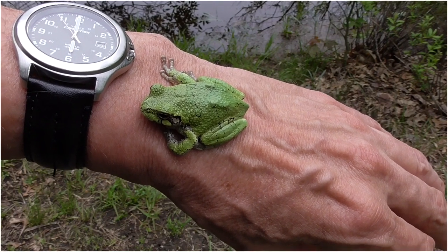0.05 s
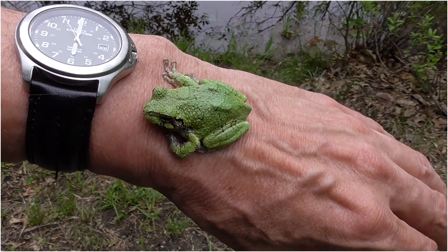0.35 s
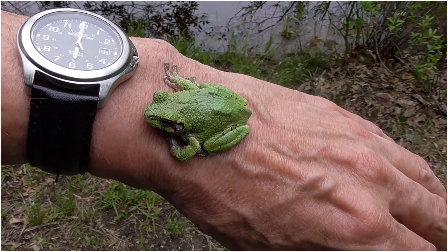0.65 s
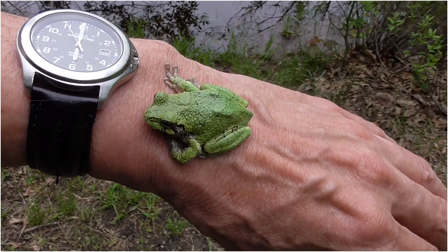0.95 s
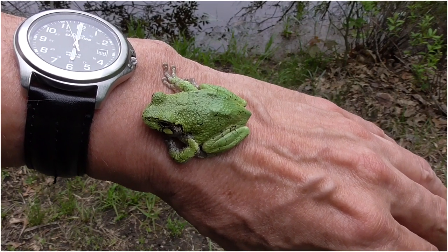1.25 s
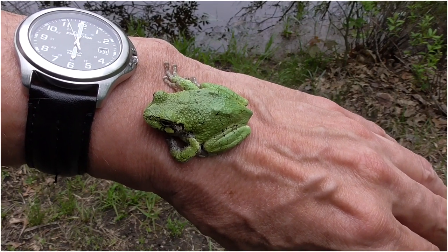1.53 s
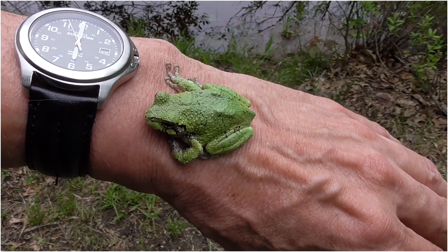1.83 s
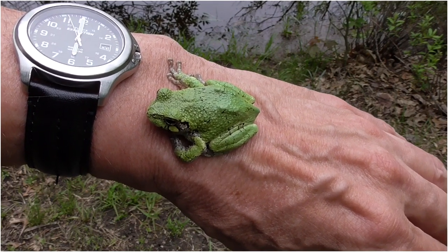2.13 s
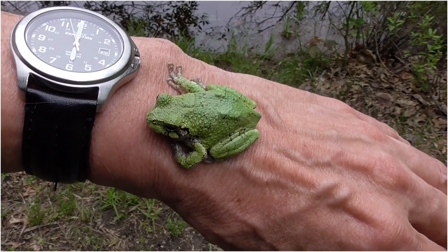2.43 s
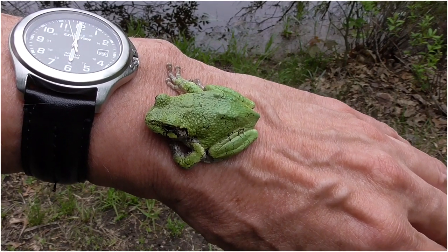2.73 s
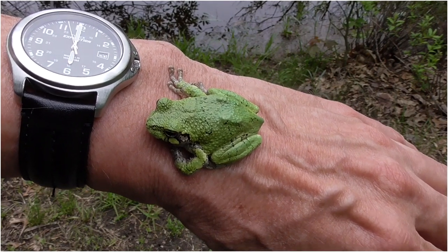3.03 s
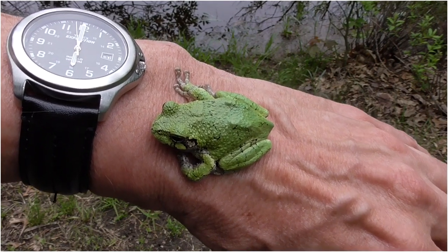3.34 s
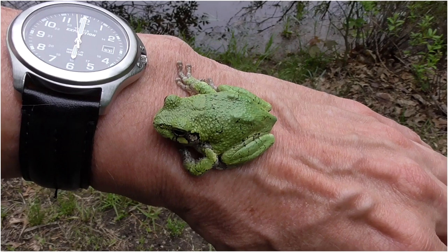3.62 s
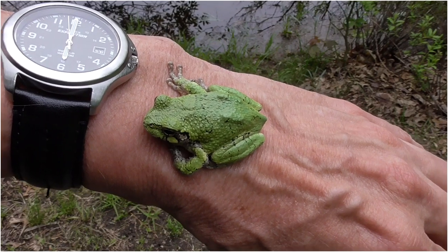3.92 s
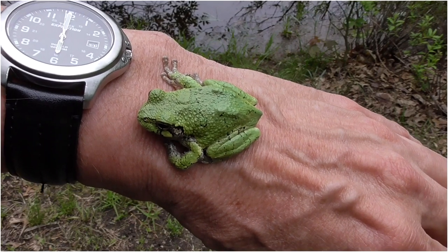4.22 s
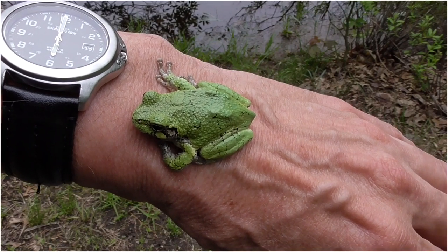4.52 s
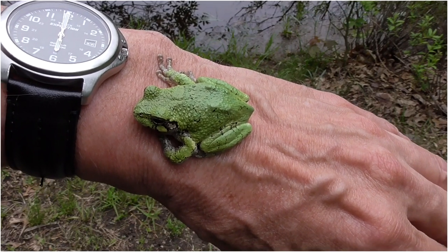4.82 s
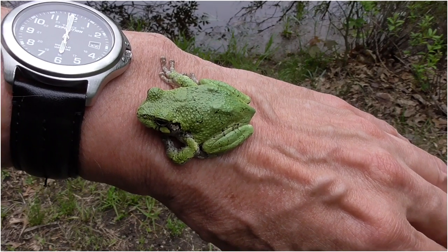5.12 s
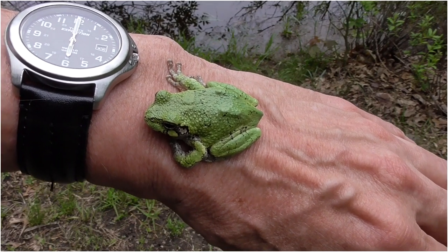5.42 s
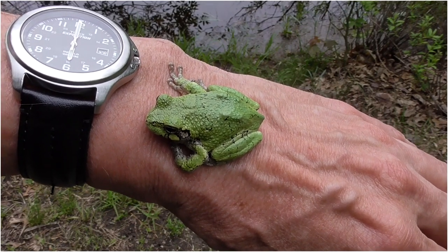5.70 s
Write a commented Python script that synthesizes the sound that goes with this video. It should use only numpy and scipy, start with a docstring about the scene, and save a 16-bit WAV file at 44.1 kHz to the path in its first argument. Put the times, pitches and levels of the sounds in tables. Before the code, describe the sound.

A quiet outdoor scene beside a pond: far wind rumbles in gentle swells throughout, under a thin, steady microphone hiss. Distant birds give faint, high, raspy calls at the very start. From about 0.2 seconds a nearer songbird whistles short phrases of quick notes that slide up and down, each leaving a brief echo among the trees. Its phrases come at roughly 0.2 to 0.6, 1.2 to 2.5, 3.1 to 4.0 and, more softly, 4.4 to 4.9 seconds, with a last brief one around 5.3. The far birds call again near 3.4 and 5.1 seconds. Four soft, dull knocks on the hand-held camera fall between 0.8 and 1.5 seconds, and tiny dry ticks are barely heard at about 1.0, 3.4 and 4.4 seconds. Two lower knocks follow in quick succession near 5.6 seconds, along with very faint distant chirps.

```python
"""From the start, far wind rumbles and the microphones hiss at the edge of a pond; distant birds call faintly.
A moment later a near songbird begins whistling short phrases of notes that slide up and down.
Trunks and leaves smear each whistle into a tail, more so when the bird faces away.
Around one second in come a few soft knocks on the hand-held camera, and the first of three tiny ticks.
The far birds call now and then; the near one stops shortly before two last knocks."""
import sys
import numpy as np
from scipy import signal
from scipy.fft import rfft, irfft
from scipy.io import wavfile

SR = 44100
rng = np.random.default_rng(int(sys.argv[2]) if len(sys.argv) > 2 else 0)


def put_to_file(sound):
    """Save the sound as 16-bit audio at rate SR, in the file named by the first command-line argument."""
    columns = np.atleast_2d(sound).T  # one column per channel
    safe = np.clip(columns, -1, 1)
    whole_steps = np.round(safe * 32767)
    wavfile.write(sys.argv[1], SR, whole_steps.astype(np.int16))


N = 262836
TIME = np.arange(N) / SR


def gain_of(db):
    """Turns decibels into a number to multiply a sound by."""
    return 10 ** (np.asarray(db) / 20)


def evened(x):
    """Scales a signal to an average strength (rms) of 1."""
    return x / np.sqrt(np.mean(x ** 2) + 1e-20)


def read(points, hz):
    """Reads between the rows of a (f/Hz, value) table, with octaves evenly spaced."""
    f, value = np.transpose(points)
    return np.interp(np.log(hz + 1), np.log(f + 1), value)


def add(mix, start_s, sound):
    """Mixes a sound in at its start time."""
    part = mix[max(round(start_s * SR), 0):][:len(sound)]
    part += sound[:len(part)]


def wander(length, hz):
    """A smooth random wobble of about size 1 that changes up to about hz times a second."""
    size = max(length, SR)
    f = np.fft.rfftfreq(size, 1 / SR)
    spectrum = rfft(rng.standard_normal(size)) * np.exp(-(f / hz) ** 2)
    return evened(irfft(spectrum, size))[:length]


def stereo_noise(colour):
    """Spectra of noise at two close microphones: alike in the bass, unrelated in the treble."""
    # how alike left and right are: f/Hz, likeness (0 to 1)
    likeness = [(30, 0.93), (125, 0.97), (250, 0.83), (500, 0.7), (1000, 0.42), (2000, 0.17), (5000, 0.14),
                (15000, 0)]
    # how the noise leans to one side: f/Hz, left minus right/dB
    balance = [(60, 1.5), (110, 0.5), (200, 0.5), (380, -0.5), (700, -1.5), (1290, -2.5), (2380, 0),
               (4400, 0.5), (8120, 0.0), (15000, -1.5)]
    hz = np.fft.rfftfreq(N, 1 / SR)
    common, separate = rfft(rng.standard_normal((2, N)))
    same, lean_db = read(likeness, hz), read(balance, hz)
    left = common * gain_of(lean_db / 2)
    right = (same * common + np.sqrt(1 - same ** 2) * separate) * gain_of(-lean_db / 2)
    return hz, np.array([left, right]) * gain_of(read(colour, hz))


def wind(calm_rumble_db=-53, calm_roar_db=-53.5, split_hz=400, top_hz=2600, waver_db=0.08):
    """Far wind: a low rumble and a soft, higher roar whose levels move with each gust."""
    # the wind's tone colour: f/Hz, relative level/dB
    colour = [(20, -35), (47, -8), (85, -3.5), (120, -1.5), (148, 0.5), (185, 0.5), (250, -2), (400, -3),
              (600, -3.5), (850, -3), (1100, -9), (1400, -19), (1800, -28.5), (2600, -34.5)]
    # gusts: t of the peak/s, half length/s, change in rumble/dB, change in roar/dB
    gusts = [(0.423, 0.13, 4, 1), (.76, 0.19, 2.8, 1.3), (1.153, .2, 2, 0.8), (1.545, .12, -0.5, 2.1),
             (2.15, 0.35, 1.3, -0.5), (2.76, .1, 2, .6), (3.53, 0.34, 3.5, 0.9), (3.963, 0.055, 2.3, 2.5),
             (4.46, 0.26, -0.5, 1.5), (5.55, .25, 1, 0.6)]
    hz, spectra = stereo_noise(colour)
    rumble_db, roar_db = calm_rumble_db + waver_db * wander(N, 1.3), calm_roar_db
    for peak_s, half_s, rumble_change, roar_change in gusts:
        swell = np.exp(-((TIME - peak_s) / half_s) ** 2)
        rumble_db += rumble_change * swell
        roar_db += roar_change * swell
    low_band = 1 / (1 + (hz / split_hz) ** 10)
    high_band = (1 - low_band) * (hz < top_hz)
    rumble = evened(irfft(spectra * low_band, N))
    roar = evened(irfft(spectra * high_band, N))
    return rumble * gain_of(rumble_db) + roar * gain_of(roar_db)


def hiss(level_db=-66.5, waver_db=0.6):
    """The microphones' own hiss; its level wavers slightly."""
    # the hiss's tone colour: f/Hz, relative level/dB
    colour = [(1000, -13), (1900, -3.5), (3000, -1.5), (6500, -4), (9000, -1.5), (12000, -2.5), (12800, -2),
              (13100, -10), (13400, -2.5), (15700, -7.5)]
    level = gain_of(level_db + waver_db * wander(N, 21))
    _, spectra = stereo_noise(colour)
    return level * evened(irfft(spectra, N))


def whistle(hz, level_db, rasp, rasp_hz=450, flutter_db=2.0, fade_s=0.0056, overtone_db=-30):
    """One side of a bird's voice box makes a nearly pure tone; a fast tremble in pitch makes it rasp."""
    count = len(hz)
    trembling_hz = hz * (1 + rasp * wander(count, rasp_hz))
    phase = 2 * np.pi * np.cumsum(trembling_hz) / SR
    level = gain_of(level_db + flutter_db * wander(count, 160))
    fade = signal.windows.tukey(count, min(2 * fade_s * SR / count, 1))
    return np.sqrt(2) * level * fade * (np.sin(phase) + gain_of(overtone_db) * np.sin(2 * phase))


def slur(top_s, rise_s, fall_s, start_hz, top_hz, end_hz, db, rasp, swell_db=4.5, brisk_hz_per_s=31500):
    """A note whose pitch climbs to a rounded top, drops quickly and levels out; gives (start, sound)."""
    rise_bend, fall_knee = 0.58, 0.42  # smaller values make the pitch move earlier
    tilt_db, ends_db = -2, -4.5  # the note weakens as it goes, and is softer at both ends
    t = np.arange(-rise_s, fall_s, 1 / SR)
    up, down = np.clip(1 + t / rise_s, 0, 1), np.clip(t / fall_s, 0, 1)
    climbed = np.sin(np.pi / 2 * up ** rise_bend) ** 2
    dropped = (1 + fall_knee ** 2) * down ** 2 / (down ** 2 + fall_knee ** 2)
    hz = start_hz + (top_hz - start_hz) * climbed + (end_hz - top_hz) * dropped
    speed = abs(np.gradient(hz)) * SR
    briskness = speed / (speed + brisk_hz_per_s) - .5  # louder while the pitch moves fast
    place = up + down - 1  # -1 at the start, 0 at the top, 1 at the end
    level_db = db + swell_db * briskness + tilt_db * place + ends_db * place ** 2
    return top_s - rise_s, whistle(hz, level_db, rasp)


def glide(start_s, length_s, start_hz, end_hz, db, rasp, arch_db=4):
    """A plain note that slides evenly and swells in the middle; gives (start, sound)."""
    progress = np.arange(0, length_s, 1 / SR) / length_s
    hz = start_hz + (end_hz - start_hz) * progress
    level_db = db + arch_db * (np.sin(np.pi * progress) - .5)
    return start_s, whistle(hz, level_db, rasp)


def echoes(x, shape, shared=0.46, echoes_per_s=4000):
    """Many random echoes that die away along a shape, partly the same at both microphones."""
    taps = rng.standard_normal((3, SR)) * (rng.random((3, SR)) < echoes_per_s / SR)
    tail = shape * (np.sqrt(shared) * taps[0] + np.sqrt(1 - shared) * taps[1:])
    tail /= np.linalg.norm(tail, axis=1, keepdims=True)
    return signal.fftconvolve(x[None], tail, axes=1)[:, :N]


def leaves(x, blur_db=0.5, blur_t60=0.1):
    """The straight path through the leaves, blurred by twigs; a t60 is the seconds to fade by 60 dB."""
    blur = echoes(x, gain_of(-60 * TIME[:SR] / blur_t60))
    return (x + gain_of(blur_db) * blur) / np.hypot(1, gain_of(blur_db))


def trees(x, near_t60=0.64, far_t60=1.8, far_db=-11.0, build_s=0.0048, clump_db=3):
    """A quick tail from near branches and a long one from the wood behind; trunks return it in clumps."""
    t = TIME[:SR]
    decay = np.hypot(gain_of(-60 * t / near_t60), gain_of(far_db - 60 * t / far_t60))
    build_up = 1 - np.exp(-t / build_s)
    clumps = gain_of(clump_db * wander(SR, 90))
    return echoes(x, decay * build_up * clumps)


def far_birds(calls_boost_db=1, straight_db=-7, pan_right_db=0.7):
    """Distant birds, heard mostly as echoes from the trees."""
    # one bird's high raspy slurs: t of the top/s, rise/s, fall/s, start f/Hz, top f/Hz, end f/Hz, level/dB
    calls = [(0, 0.0056, 0.089, 6550, 6420, 5590, -60), (0.095, 0.016, .056, 5600, 5630, 4580, -55.5),
             (3.405, .011, 0.029, 4200, 4950, 3840, -58.5), (3.452, 0.027, 0.013, 4200, 5010, 4830, -56.5),
             (3.484, 0.019, 0.04, 4900, 5690, 4400, -58), (5.061, 0.041, .02, 4500, 5690, 4660, -59),
             (5.075, .004, 0.0244, 4260, 4310, 3770, -52), (5.126, .036, 0.0203, 3860, 5580, 5010, -57.5),
             (5.147, 0.006, 0.0244, 5200, 5350, 4660, -52)]
    # faint chirps from deep in the wood: t/s, length/s, start f/Hz, end f/Hz, level/dB
    chirps = [(0, 0.021, 4140, 4090, -64), (.815, 0.026, 4800, 3440, -71), (5.611, 0.047, 3700, 3210, -73),
              (5.675, .028, 5300, 5600, -76), (5.69, .05, 2900, 2600, -75)]
    raspy, chirping = np.zeros((2, N))
    for row in calls:
        add(raspy, *slur(*row, rasp=0.0244))
    for row in chirps:
        add(chirping, *glide(*row, rasp=0.0093))
    song = gain_of(calls_boost_db) * raspy + chirping
    heard = gain_of(straight_db) * leaves(song) + trees(song)
    return heard * gain_of([[-pan_right_db], [pan_right_db]])


def near_bird(closing_scatter_db=-7, pan_right_db=1.5):
    """The near singer: turning its head shifts each note between the straight path and the trees."""
    # its arching notes: t of the top/s, rise/s, fall/s, start f/Hz, top f/Hz, end f/Hz, level/dB,
    # scattered over straight sound/dB
    slurs = [ (.253, .022, 0.026, 3165, 3590, 2395, -55, 12),
             (.320, 0.03, 0.043, 2555, 4110, 2560, -55.5, 8),
             (.440, 0.02, 0.029, 3020, 3550, 2510, -53.5, 7),
             (.466, 0.019, 0.027, 3130, 4370, 3520, -54.5, 13),
             (.497, .006, 0.055, 3850, 4150, 2560, -54, 2), (.575, 0.026, 0.039, 2660, 3710, 2450, -58, -4),
             (1.257, .027, 0.035, 3290, 4130, 3350, -59.5, -5),
             (1.328, .038, .02, 3400, 4720, 4720, -57, -1), (1.354, .006, 0.061, 4670, 4700, 2576, -56, -1),
             (1.468, .008, 0.02, 4870, 4950, 4750, -54, 7),
             (1.484, 0.0057, 0.063, 4520, 4670, 2834, -51.5, 4),
             (1.581, 0.024, .02, 2880, 3280, 3100, -52.5, 1),
             (1.597, 0.0042, 0.021, 2650, 2650, 2330, -59.5, -4),
             (1.704, 0.0083, 0.015, 2780, 2990, 2280, -62, 3),
             (1.74, 0.014, 0.016, 2400, 2900, 2360, -65, -2),
             (1.940, 0.02, 0.033, 3180, 3646, 2340, -59, -4),
             (2.034, 0.045, 0.0064, 2390, 4550, 4550, -57.5, -3),
             (2.048, 0.0043, 0.027, 4350, 4390, 3770, -59.5, -3),
             (2.289, 0.014, 0.025, 3110, 3680, 2950, -55, 5), (2.345, .033, .03, 3125, 4250, 4200, -54, 6),
             (2.394, 0.016, 0.037, 4030, 4150, 2955, -53.5, 2),
             (2.372, .004, 0.023, 4870, 5100, 3915, -51, 6),
             (2.441, .018, 0.017, 2960, 3070, 2820, -53.5, -1),
             (3.098, 0.047, .062, 3150, 4570, 2590, -60, -1.5),
             (3.327, .024, 0.036, 3220, 3730, 2460, -57.5, -4),
             (3.384, 0.021, 0.042, 2490, 2900, 2205, -62, -3),
             (3.644, 0.017, 0.019, 3276, 3540, 2770, -57.5, 0),
             (3.692, .028, 0.022, 2900, 3800, 3700, -53.5, 4),
             (3.728, .008, 0.031, 3620, 3700, 2510, -53.5, 5.5),
             (3.72, 0.0087, .036, 4530, 4720, 3370, -57, 5),
             (3.908, 0.0036, 0.0124, 4600, 4790, 4080, -55, 7),
             (3.917, .004, 0.048, 3950, 3950, 2640, -51.5, 5),
             (3.990, 0.023, 0.024, 2680, 3755, 2980, -54, 2),
             (4.459, .012, 0.0076, 3340, 3540, 2620, -65, -13),
             (4.514, 0.032, 0.029, 2810, 3650, 3200, -59.5, -6),
             (4.539, .004, 0.035, 3750, 3830, 2520, -59.5, -11),
             (4.587, 0.015, 0.028, 2560, 2810, 2290, -65, -6),
             (4.765, 0.025, 0.033, 3010, 3440, 2520, -62, -4),
             (4.824, 0.022, .028, 2500, 3300, 2400, -63, -1),
             (5.274, 0.022, .027, 2540, 3560, 2570, -51.5, 1.5),
             (5.320, 0.02, 0.038, 2740, 3600, 2890, -53.5, -4),
             (5.322, .012, 0.031, 4370, 4880, 3570, -52, 5)]
    # low, nearly flat whistles that close its phrases: t/s, length/s, start f/Hz, end f/Hz, level/dB
    closing_notes = [(1.75, 0.039, 2354, 2320, -65.5), (1.807, 0.04, 2350, 2144, -66.5),
                     (2.451, 0.034, 2470, 2320, -60.5), (3.14, 0.028, 2760, 2490, -63),
                     (3.177, 0.026, 2377, 2260, -64.5), (3.42, 0.022, 2200, 2340, -69),
                     (3.779, 0.077, 2450, 2363, -60), (4.6, 0.046, 2284, 2290, -62.5),
                     (5.22, 0.044, 2640, 2310, -62)]
    notes = [(slur(*row, rasp=0.012), scatter_db) for *row, scatter_db in slurs]
    notes += [(glide(*row, rasp=0.005), closing_scatter_db) for row in closing_notes]
    straight, scattered = np.zeros((2, N))
    for (start_s, note), scatter_db in notes:
        ratio = gain_of(scatter_db)
        add(straight, start_s, note / np.hypot(1, ratio))
        add(scattered, start_s, note * ratio / np.hypot(1, ratio))
    heard = leaves(straight) + trees(scattered)
    return heard * gain_of([[-pan_right_db], [pan_right_db]])


def camera_knocks():
    """Soft knocks on the camera, each a dull tone that rings very briefly."""
    # knocks: t/s, peak level/dB, f/Hz, rise/s, time to fade by 60 dB/s
    knocks = [(.776, -42.5, 697, 0.005, 0.031), (1.054, -36, 504, 0.00089, 0.016),
              (1.4085, -35, 617, 0.0021, 0.038), (1.5205, -39, 716, 0.0027, 0.013),
              (5.6, -40.5, 257, .003, 0.11), (5.675, -36.5, 243, .002, 0.033)]
    out, t = np.zeros(N), TIME[:SR // 8]
    for start_s, db, hz, rise_s, t60 in knocks:
        attack = np.minimum(t / rise_s, 1)
        decay = gain_of(db - 60 * np.maximum(t - rise_s, 0) / t60)
        add(out, start_s, attack * decay * np.sin(2 * np.pi * hz * t))
    return out


def camera_ticks(t60=0.046):
    """Tiny dry ticks from handling the camera, each a burst of high noise one octave wide."""
    # ticks: t/s, starting level/dB, centre f/Hz
    ticks = [(1.037, -65, 4700), (3.401, -67, 9700), (4.411, -65, 8960)]
    out, t = np.zeros(N), TIME[:SR // 8]
    for start_s, db, hz in ticks:
        band = signal.butter(2, [hz / np.sqrt(2), hz * np.sqrt(2)], "bandpass", fs=SR, output="sos")
        noise = evened(signal.sosfilt(band, rng.standard_normal(len(t))))
        add(out, start_s, noise * gain_of(db - 60 * t / t60))
    return out


def scene():
    """Birds, wind and the small sounds at the camera, in stereo."""
    return near_bird() + far_birds() + wind() + hiss() + camera_knocks() + camera_ticks()


def record(dry):
    """The recorder steeply cuts off the highest treble."""
    cutoff_hz = 15750
    low_pass = signal.firwin(511, cutoff_hz, window=("kaiser", 9), fs=SR)
    return signal.oaconvolve(dry, low_pass[None], "same")


dry = scene()
out = record(dry)
put_to_file(out)
```